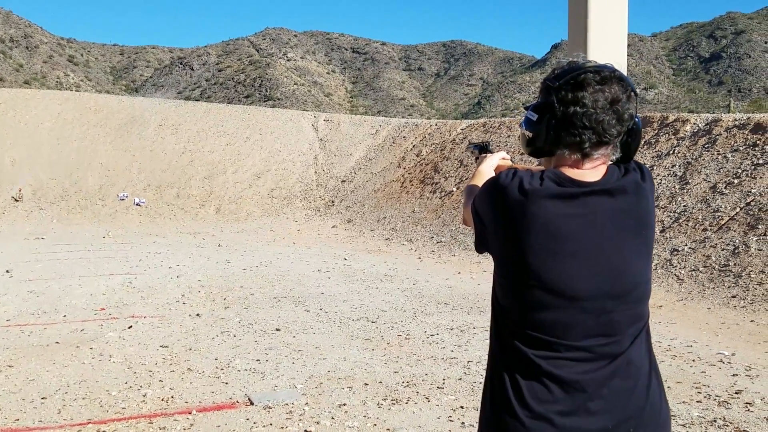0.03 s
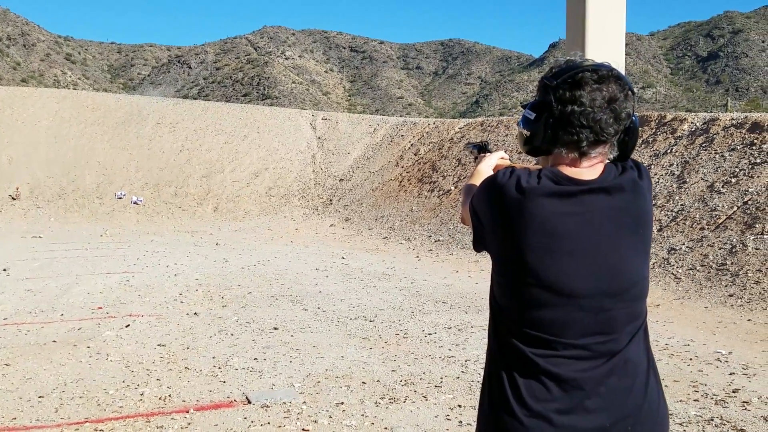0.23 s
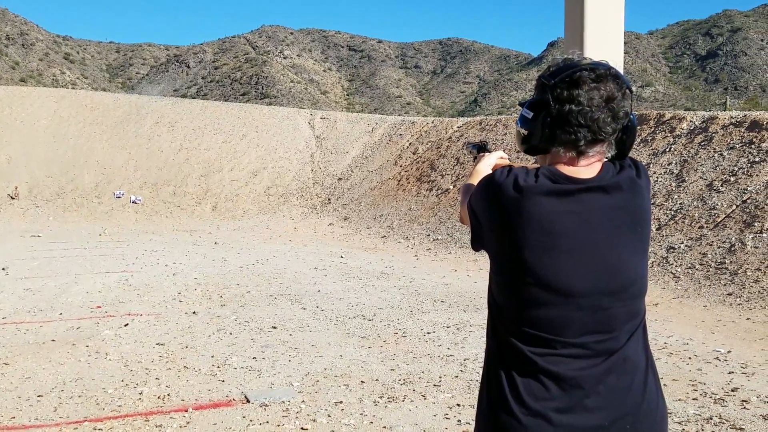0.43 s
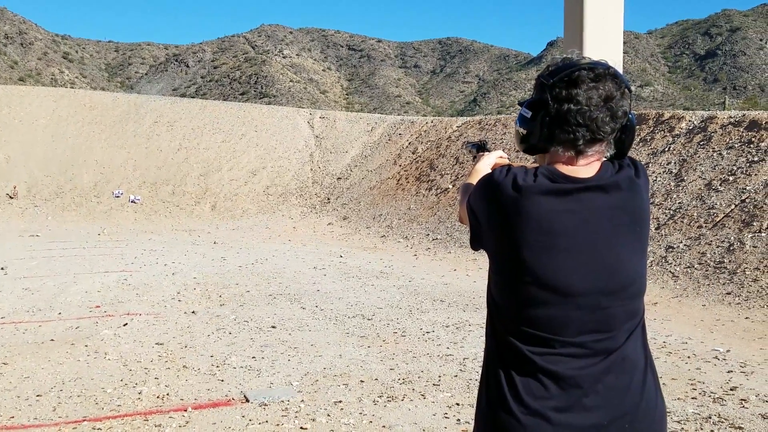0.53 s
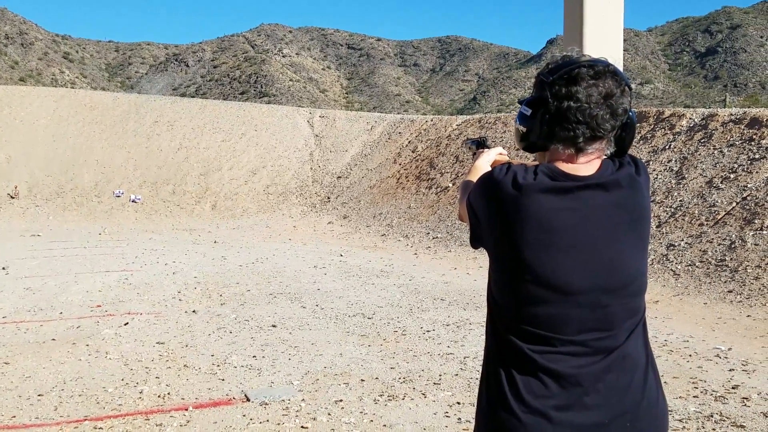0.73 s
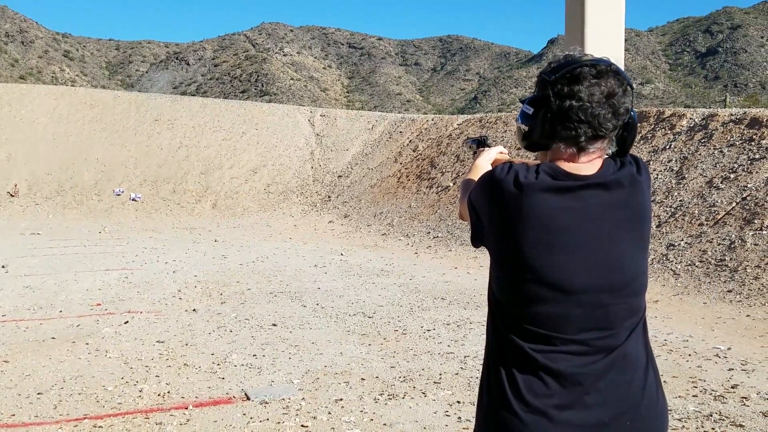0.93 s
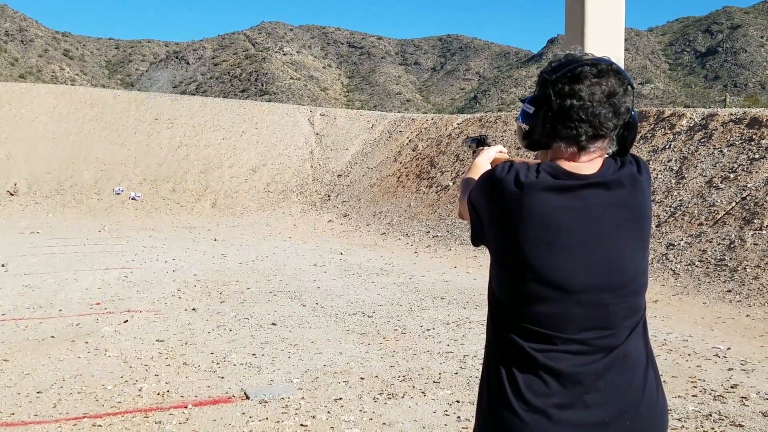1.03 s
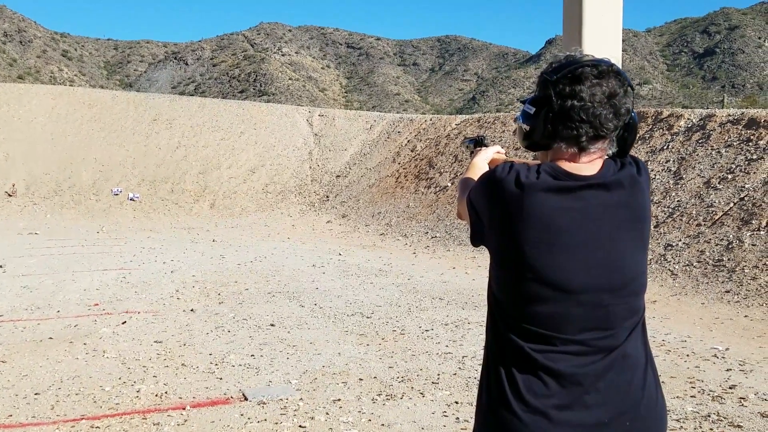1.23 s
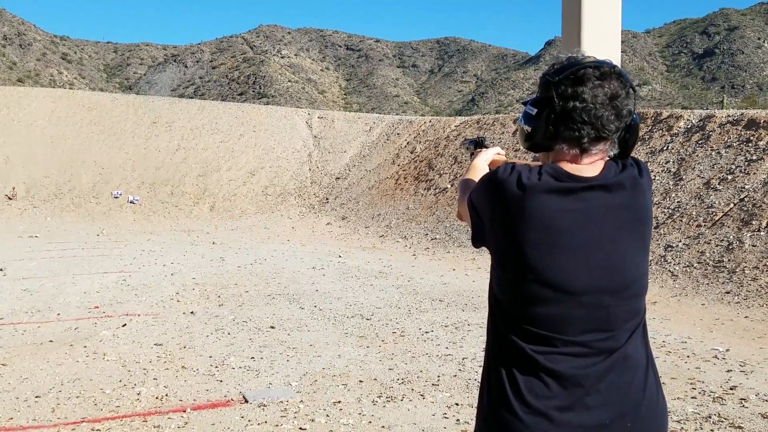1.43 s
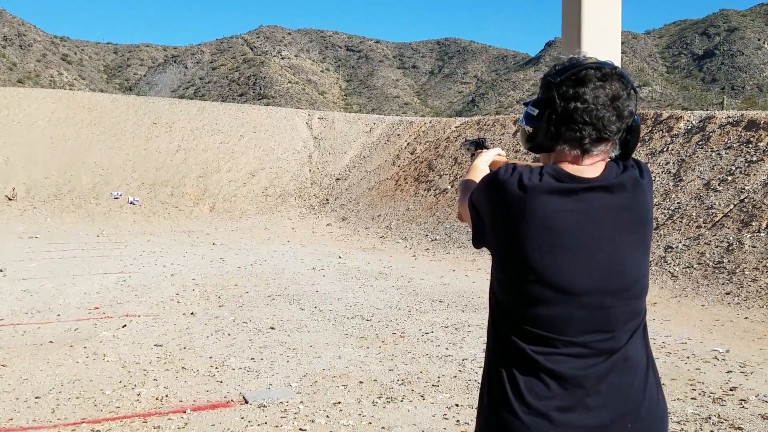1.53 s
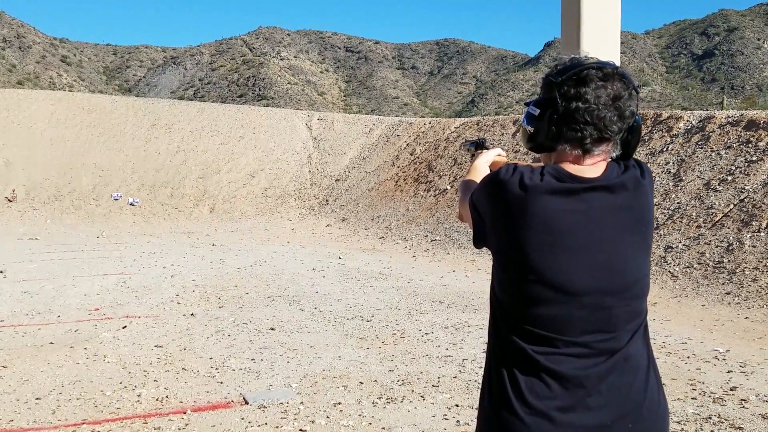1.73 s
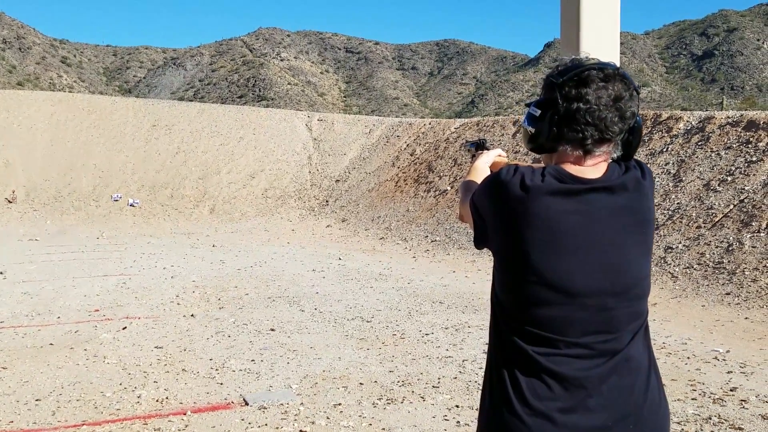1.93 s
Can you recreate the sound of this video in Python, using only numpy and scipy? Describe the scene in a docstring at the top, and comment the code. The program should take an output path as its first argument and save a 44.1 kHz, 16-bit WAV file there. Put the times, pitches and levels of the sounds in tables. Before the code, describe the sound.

Faint wavering hum and low outdoor hiss open the scene. At about 0.2 seconds a close pistol fires, a short, hard, mid-heavy bark, left of centre and slightly overloaded. Dense reflections from dirt banks follow until roughly 0.5, thinning into a long, soft roll from the hills. Two faint clanks come near 0.67 on the right. At 1.2 a smaller, dry crack sounds from another bay, scatters briefly and fades.

```python
"""A faint wavering hum and low outdoor noise, then a pistol shot from a covered point on a desert range.
Gas noise and sine surges make the blast, which overloads two microphone ports a hand apart.
Dying noise makes the wash off the earth berms and the long roll; pulses with scatter make the echoes.
Decaying sines make two faint clanks; a second after the blast, an N-shaped pulse cracks from another bay."""
import sys
import numpy as np
from scipy import signal
from scipy.fft import rfft, irfft
from scipy.io import wavfile

SR = 44100
rng = np.random.default_rng(int(sys.argv[2]) if len(sys.argv) > 2 else 0)


def wav_record(signal):
    """Record a signal, one row per channel, as 16-bit PCM in the file named by sys.argv[1]."""
    frames = np.transpose(np.atleast_2d(signal))
    bounded = np.clip(frames, -1, 1)
    # unit amplitude maps onto the largest positive 16-bit level
    quanta = np.round(bounded * 32767).astype(np.int16)
    wavfile.write(sys.argv[1], SR, quanta)


N = 88200   # two seconds
T = np.arange(N) / SR
SIZE = 2 * N   # padded transform length
HZ = np.maximum(np.arange(N + 1) * SR / SIZE, 1)

# Steady hum tones at mid-scene: [f/Hz, rms level/dB]
HUM_TONES = [(631.6, -64.5), (688, -79.5), (278, -86)]
# Colour of outdoor noise and microphone hiss: [f/Hz, relative level per Hz/dB]
FLOOR_COLOUR = [(25, -3), (100, 6), (220, -1), (480, 3.5), (640, 10), (850, -1), (1900, -6), (4000, -14.5),
                (7000, -20.5), (10000, -20.5), (13000, -13), (16000, -15)]
# Scatter after the other shot, before any stretch: [f/Hz, relative level per Hz/dB, t60/s]
OTHER_SCATTER = [(39.5, -19, 0.11), (102, 3, 0.054), (240, -16.5, 0.051), (377, -2, 0.059), (930, -5, 0.16),
                 (1290, -6.5, 0.14), (1900, -5.5, 0.18), (2420, -15, 0.19), (3500, -9.5, 0.14),
                 (5150, -19.5, 0.087), (7600, -36.5, 0.29), (9200, -27, 0.14), (11100, -55, 0.086)]
# Ringing after the crack: [f/Hz, level/dB, t60/s]
CRACK_MODES = [(967, -39.5, 0.074), (3410, -44.5, 0.026), (5350, -42.5, 0.025), (9200, -51.5, 0.021)]
# Distant clanks, perhaps the bullet landing: [t/s, level/dB]
CLANK_HITS = [(0.663, -43), (0.686, -35.5)]
# Ringing modes of a clank: [f/Hz, relative level/dB, t60/s]
CLANK_MODES = [(650, 0.5, .035), (1826, -1, 0.046), (1940, -9, 0.028), (2210, -10.5, 0.039)]
# Roll from the hills: [f/Hz, relative level per Hz/dB, t60/s]
HILL_ROLL = [(40, -23, 2.2), (131, -10, 1.94), (262, -12.5, 2.13), (370, 0.5, 1.27), (610, 0, 1.82),
             (1066, -3.5, 1.67), (1550, -13, 1.42), (1870, -4.5, 1.15), (2800, -17.5, 1.49),
             (3300, -13.5, 1.2), (6900, -29, 1.1), (15000, -35, 0.79)]
# Reflections from nearby berms, before the closing fade: [f/Hz, relative level per Hz/dB, t60/s]
BERM_WASH = [(37, -22, 0.36), (104, -32, 0.76), (222, -21.5, 0.94), (433, -12, 0.22), (509, 1, 0.29),
             (700, 4.5, 0.51), (882, -2.5, 0.3), (1180, -7.5, 0.88), (1650, -12, 0.31), (2100, -11, 0.68),
             (2810, -25.5, 0.73), (3440, -21, 0.91), (4640, -32.5, 0.6), (8450, -34, 0.31),
             (15000, -32, 0.14)]
# Echoes of single banks and slopes: [t/s, level/dB, t60/s, bearing/deg, lowest f/Hz, highest f/Hz]
BANK_ECHOES = [(.2520, -22, 0.049, 29, 118, 2470), (.2690, -22.5, 0.045, 29, 61.7, 14000),
               (0.271, -23, 0.092, 69, 890, 14300), (0.274, -48.5, 0.075, 43.5, 4960, 14500),
               (0.284, -23, 0.0606, 23, 50, 1700), (0.3, -31.5, 0.092, -13, 174, 323),
               (0.3143, -20, 0.011, -12, 435, 1300), (.3290, -33.5, 0.088, 22, 770, 2540),
               (.3460, -28.5, 0.0876, 27, 390, 2450), (.3540, -44.5, 0.14, 15.5, 3020, 14000),
               (.3830, -35.5, 0.0326, 2, 554, 2500), (.4470, -30, 0.0343, -16.5, 69.5, 2750),
               (0.514, -50.5, 0.026, -9, 900, 4000), (.5435, -38.5, 0.012, -53, 420, 810),
               (.5860, -57, 0.15, -29.5, 2800, 6170), (0.615, -45, 0.057, -12, 265, 526),
               (0.635, -46, 0.087, -17, 244, 483), (0.712, -41, 0.034, -18, 99, 6700),
               (0.7127, -54.5, 0.029, -29, 3500, 6500), (0.7453, -42.5, 0.036, -39, 490, 2960),
               (.8302, -40.5, 0.016, -28, 344, 795), (.8308, -52, .016, -8, 1500, 3720),
               (0.886, -52.5, 0.086, -15, 121, 670), (0.939, -54.5, 0.11, -12, 117, 387),
               (1.11, -56, 0.11, 7, 436, 1230)]
# Colour shared by the echoes: [f/Hz, relative level per Hz/dB]
ECHO_COLOUR = [(50, -18.5), (150, -4), (350, -5), (550, 7.5), (720, 8), (1150, -5), (1550, -5),
               (2000, -0.5), (2800, -14), (3500, -10), (4400, -29), (5800, -23.5), (7500, -35),
               (15000, -35)]
# The blast and its returns from the roof: [t/s, f/Hz, level/dB, length/s]
BLAST_SURGES = [(0.2237, 704, -8.5, 0.0088), (0.2342, 587, -6, 0.0076), (0.2419, 695, -13, 0.0041)]
# Weaker resonances under the roof: [f/Hz, level/dB]
ROOF_BOOM = [(100, -36), (165, -30), (520, -22.5), (760, -31), (1060, -19.5), (1960, -26)]
# Colour of the rush of muzzle gas: [f/Hz, relative level per Hz/dB]
GAS_COLOUR = [(30, -43.5), (90, -1), (280, -8.5), (600, -5), (950, 7.5), (1600, -12.5), (2150, -5),
              (3000, -11.5), (4500, -31), (15000, -32)]

# Bearings: left is positive
HUM_WAVER, HUM_WAVER_HZ, HUM_FADE_DB_PER_S = 0.077, 1.3, 3   # waver: rms gain share and radians
FLOOR_DB = -63
OTHER_SHOT_S, OTHER_BEARING_DEG = 1.1989, 30.7
CRACK_DB, CRACK_S, CRACK_TOP_HZ = -23, 0.00047, 6140   # level before softening
GROUND_DELAY_S, GROUND_DB = 0.00108, -4.5   # bounce relative to the direct crack
OTHER_DB, OTHER_RISE_S = -37.5, 0.0014
OTHER_LATE_DB, OTHER_LATE_STRETCH = -52, 4.5
CLANK_RISE_S, CLANK_BEARING_DEG = 0.00099, -59
SHOT_S, SHOT_BEARING_DEG = 0.2218, 48.5
ROLL_DB, ROLL_RISE_S = -35.5, 0.087
WASH_DB, WASH_RISE_S, WASH_HOLD_S, WASH_END_T60_S = -17, 0.0061, 0.15, 0.29
ROLL_LUMPS_DB, WASH_LUMPS_DB, LUMPS_HZ = 2, 2, 43.4   # rms depths and wander's low-pass cutoff
ECHO_RISE_SHARE = 0.054   # rise as a share of the echo's t60
SLAP_T60_S = 0.032   # at this t60 an echo is half pulse, half scatter; shorter ones slap harder
ATTACK_S, HOLD_S, RELEASE_T60_S = 0.0027, 0.0178, 0.013
BOOM_DELAY_S = 0.00169
BLAST_DB, BLAST_RISE_S = -23, 0.0097
PORT_SPACING_M, SOUND_M_PER_S = 0.16, 343
SHADOW_DB = 0.4   # gained at the near port and lost at the far one, for a sound from the side
PORT_LIKENESS = 0.81   # likeness of diffuse sound at the ports, before spacing lowers it
DIRECTIONS_DEG = range(5, 90, 10)
OVERLOAD_TOP, CRACKLE_DB, CRACKLE_LOW_HZ = 0.77, -21.5, 500
CUTOFF_HZ = 15800


def from_db(db):
    """Decibels to gain."""
    return 10 ** (np.asarray(db) / 20)


def colour(x, spectrum):
    """Causal filter that follows a spectrum; white noise keeps its level."""
    hz, db = np.array(spectrum)[:, :2].T
    gain = from_db(np.interp(np.log(HZ), np.log(hz), db))
    # Folding the cepstrum forward in time gives minimum phase
    cepstrum = irfft(np.log(gain / np.sqrt(np.mean(gain ** 2))))
    cepstrum[1:N] *= 2
    cepstrum[N + 1:] = 0
    return irfft(rfft(x, SIZE) * np.exp(rfft(cepstrum)))[..., :N]


def dull(x, hz):
    """Gentle low-pass."""
    return signal.sosfilt(signal.butter(2, hz, fs=SR, output="sos"), x + 1e-18)


def envelope(start, rise, hold, t60):
    """Linear attack; exponential release once the hold, counted from the start, is over."""
    age = T - start
    release = np.exp(-np.log(1000) * np.maximum(age - hold, 0) / t60)
    return np.clip(age / rise, 0, 1) * release


def port_phase(bearing_deg):
    """Radians by which the left port leads, at each frequency."""
    lead_s = PORT_SPACING_M / SOUND_M_PER_S * np.sin(np.radians(bearing_deg))
    return 2 * np.pi * HZ * lead_s


def arrive(x, bearing_deg):
    """A sound from one direction reaches the far port later and a little weaker."""
    shadow = from_db(SHADOW_DB * np.sin(np.radians(bearing_deg)) * np.array([[1], [-1]]))
    right = irfft(rfft(x, SIZE) * np.exp(-1j * port_phase(bearing_deg)))[:N]
    return shadow * np.array([x, right])


def diffuse():
    """White noise from all round the horizon, its likeness at the two ports set by their spacing."""
    alike = PORT_LIKENESS * np.mean([np.cos(port_phase(deg)) for deg in DIRECTIONS_DEG], axis=0)
    mid, side = rfft(rng.standard_normal((2, SIZE)))
    mid = mid * np.sqrt((1 + alike) / 2)
    side = side * np.sqrt((1 - alike) / 2)
    return irfft([mid + side, mid - side])[:, :N]


def dying_noise(start, rise, table, stretch=1):
    """Dense reflections from all round; each band dies at its own rate."""
    hz, _, t60s = np.transpose(table)
    noise = rfft(colour(diffuse(), table), SIZE)
    out = 0
    for band, t60 in zip(np.eye(len(hz)), t60s):   # overlapping bands
        weight = np.interp(np.log(HZ), np.log(hz), band)
        band_noise = irfft(noise * weight)[:, :N]
        out = out + band_noise * envelope(start, rise, 0, t60 * stretch)
    return out


def ring(s, rise, modes):
    """Decaying modes, all struck at one moment."""
    return sum(from_db(db) * np.sin(2 * np.pi * hz * (T - s)) * envelope(s, rise, 0, t60)
               for hz, db, t60 in modes)


def background():
    """A wavering hum, slowly fading, over even outdoor noise."""
    hum = 0
    for hz, db in HUM_TONES:
        waver = dull(rng.standard_normal((2, SIZE)), HUM_WAVER_HZ)[:, N:]
        swell, phase = HUM_WAVER * waver / waver.std()
        level = np.sqrt(2) * from_db(db - HUM_FADE_DB_PER_S * (T - T.mean()))
        hum = hum + level * (1 + swell) * np.sin(2 * np.pi * hz * T + phase)
    return hum + from_db(FLOOR_DB) * colour(diffuse(), FLOOR_COLOUR)


def other_shot():
    """An N-shaped crack, its bounce off the ground, a brief ring, a short scatter and a fainter long one."""
    crack = 0
    bounce = (OTHER_SHOT_S + GROUND_DELAY_S, CRACK_DB + GROUND_DB)
    for s, db in ((OTHER_SHOT_S, CRACK_DB), bounce):
        u = (T - s) / CRACK_S
        crack = crack + from_db(db) * (1 - 2 * u) * ((u >= 0) & (u < 1))
    crack = dull(dull(crack, CRACK_TOP_HZ), CRACK_TOP_HZ)
    ringing = ring(OTHER_SHOT_S, CRACK_S, CRACK_MODES)
    near = from_db(OTHER_DB) * dying_noise(OTHER_SHOT_S, OTHER_RISE_S, OTHER_SCATTER)
    late = dying_noise(OTHER_SHOT_S, WASH_RISE_S, OTHER_SCATTER, OTHER_LATE_STRETCH)
    return arrive(crack + ringing, OTHER_BEARING_DEG) + near + from_db(OTHER_LATE_DB) * late


def clanks():
    """Two faint knocks from downrange, each a set of decaying modes."""
    knocks = sum(from_db(db) * ring(s, CLANK_RISE_S, CLANK_MODES) for s, db in CLANK_HITS)
    return arrive(knocks, CLANK_BEARING_DEG)


def lumps(depth_db):
    """Uneven ground returns sound in clumps: a quickly wandering gain."""
    wander = dull(rng.standard_normal(SIZE), LUMPS_HZ)[N:]
    return from_db(depth_db * wander / wander.std())


def echo(s, db, t60, bearing_deg, low_hz, high_hz):
    """A mirrored pulse and its scatter, in the slope's band; smooth banks slap, rough slopes swell."""
    rise = ECHO_RISE_SHARE * t60
    shape = envelope(s, rise, rise, t60)
    energy = np.sum(shape ** 2)
    x = shape * rng.standard_normal(N)
    x[int((s + rise) * SR)] += np.sqrt(energy) * (SLAP_T60_S / t60) ** 2   # mirrored pulse
    slope_band = signal.butter(4, [low_hz, high_hz], "band", fs=SR, output="sos")
    x = signal.sosfilt(slope_band, colour(x, ECHO_COLOUR) + 1e-18)
    return arrive(from_db(db) * x * np.sqrt(energy / np.sum(x ** 2)), bearing_deg)


def terrain():
    """The wash lasts until the back berm has answered; the hills roll on, with single echoes."""
    wash = dying_noise(SHOT_S, WASH_RISE_S, BERM_WASH)
    wash = wash * envelope(SHOT_S, ATTACK_S, WASH_HOLD_S, WASH_END_T60_S) * lumps(WASH_LUMPS_DB)
    roll = dying_noise(SHOT_S, ROLL_RISE_S, HILL_ROLL) * lumps(ROLL_LUMPS_DB)
    echoes = sum(echo(*row) for row in BANK_ECHOES)
    return from_db(WASH_DB) * wash + from_db(ROLL_DB) * roll + echoes


def pistol():
    """The muzzle blast: barking surges over weaker resonances, low and high, and a brief rush of gas."""
    bark = 0
    for s, hz, db, length in BLAST_SURGES:
        arch = np.sin(np.pi * np.clip((T - s) / length, 0, 1))
        bark = bark + from_db(db) * np.sin(2 * np.pi * hz * (T - s)) * arch
    start = SHOT_S + BOOM_DELAY_S
    boom = 0
    for k, (hz, db) in enumerate(ROOF_BOOM):   # alternating polarity
        boom = boom + (-1) ** k * from_db(db) * np.sin(2 * np.pi * hz * (T - start))
    boom = boom * envelope(start, ATTACK_S, HOLD_S - BOOM_DELAY_S, RELEASE_T60_S)
    gas = rng.standard_normal(N) * envelope(SHOT_S, BLAST_RISE_S, HOLD_S, RELEASE_T60_S)
    gas = from_db(BLAST_DB) * colour(gas, GAS_COLOUR)
    return arrive(bark + boom + gas, SHOT_BEARING_DEG)


def scene():
    """Everything at the two ports."""
    return background() + other_shot() + clanks() + terrain() + pistol()


def record(dry):
    """Overload rounds the peaks and crackles on them; the top is cut."""
    crackle = from_db(CRACKLE_DB) * dry ** 2 * rng.standard_normal(dry.shape)
    crackle = crackle - dull(crackle, CRACKLE_LOW_HZ)   # thins the lows
    loud = OVERLOAD_TOP * np.tanh(dry / OVERLOAD_TOP) + crackle
    return signal.sosfilt(signal.ellip(10, 0.1, 70, CUTOFF_HZ, fs=SR, output="sos"), loud)


dry = scene()
out = record(dry)
wav_record(out)
```